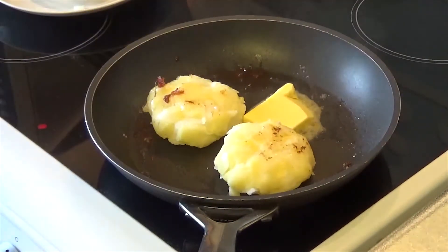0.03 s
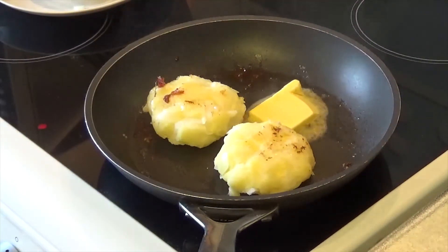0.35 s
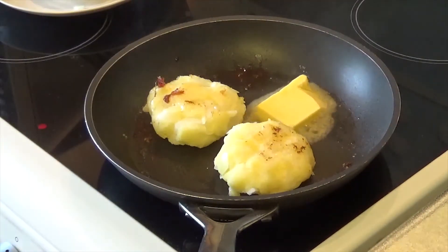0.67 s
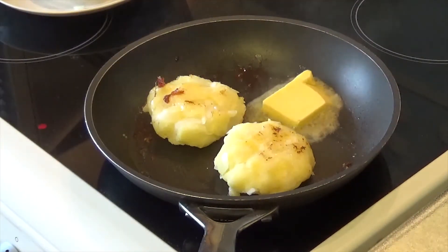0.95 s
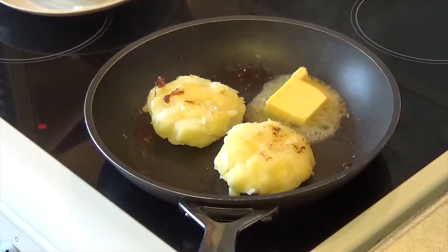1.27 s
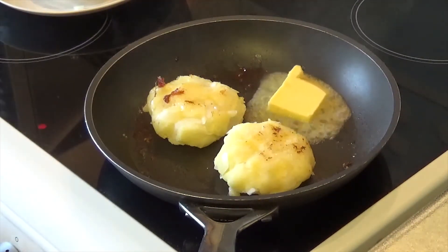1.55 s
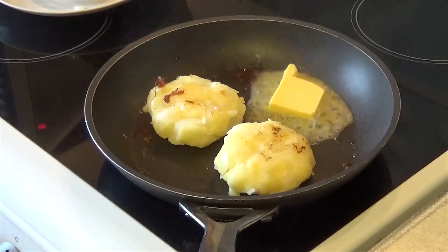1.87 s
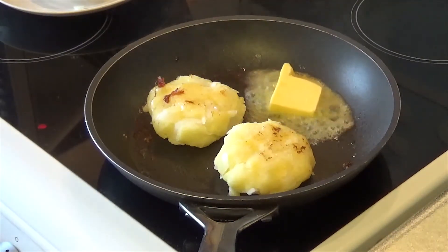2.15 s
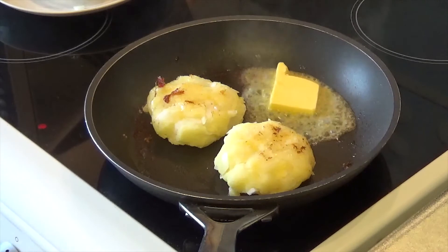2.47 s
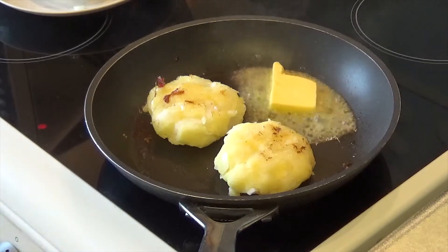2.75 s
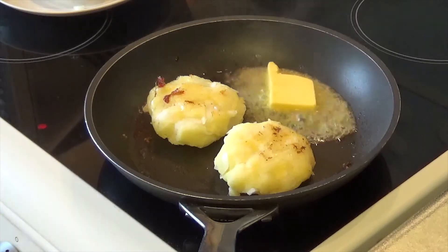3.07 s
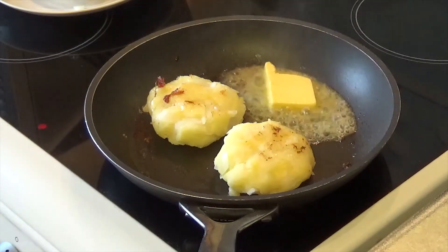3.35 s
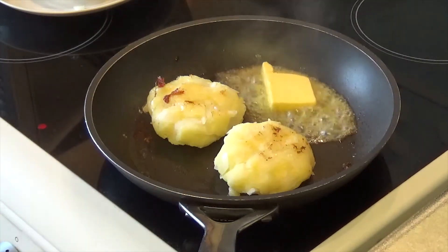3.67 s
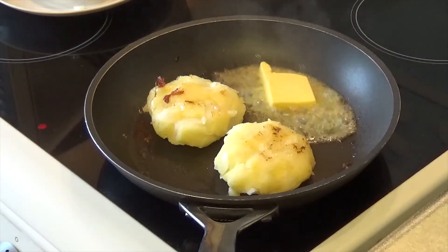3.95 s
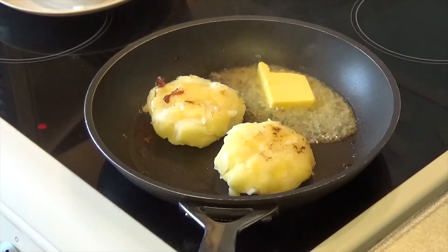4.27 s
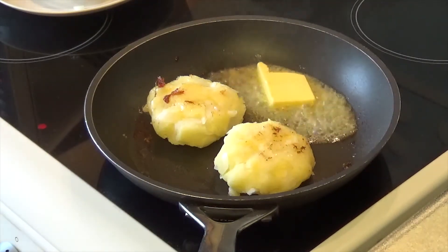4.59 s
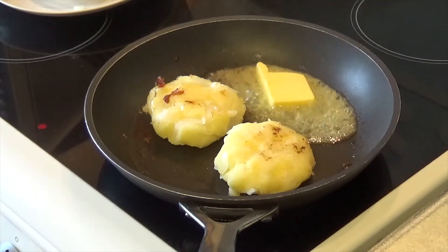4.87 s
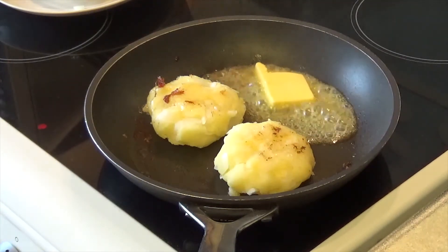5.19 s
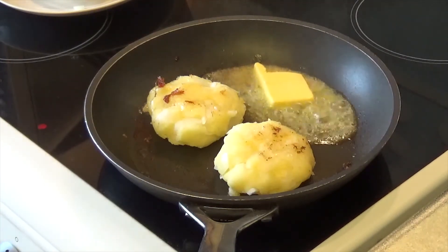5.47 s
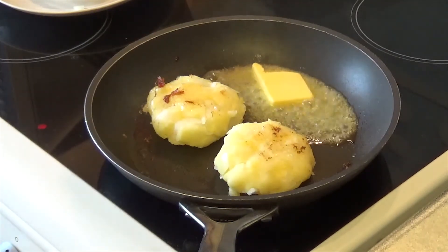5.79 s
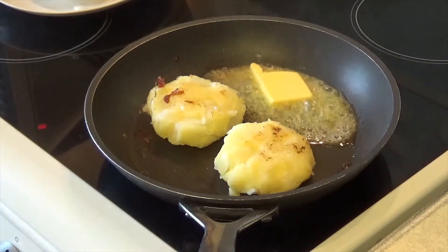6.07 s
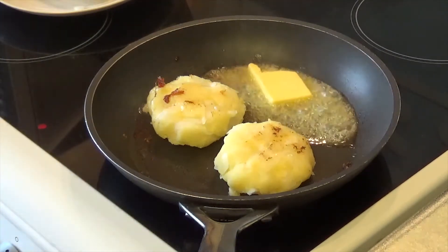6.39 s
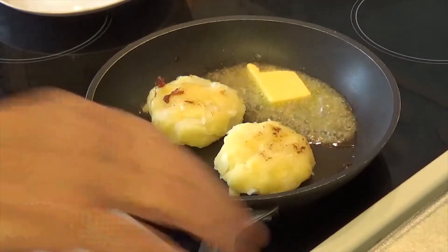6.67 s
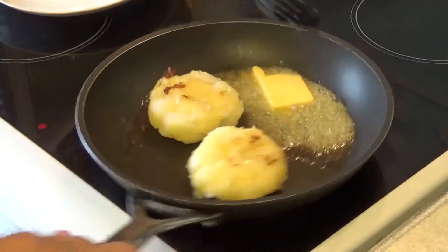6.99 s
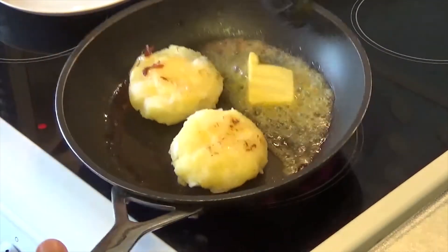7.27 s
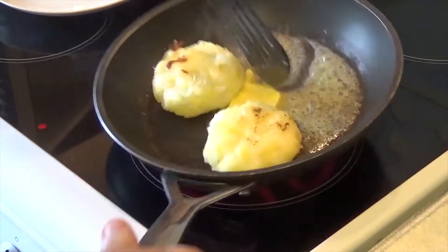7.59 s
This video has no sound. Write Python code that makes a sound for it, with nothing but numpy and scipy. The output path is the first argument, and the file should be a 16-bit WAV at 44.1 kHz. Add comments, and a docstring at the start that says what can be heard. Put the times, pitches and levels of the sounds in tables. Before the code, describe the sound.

In a small kitchen, a close microphone picks up the bright, continuous fizz of potato cakes frying in butter, over a faint fan. Further off, a utensil is dragged out with a ringing rasp, then objects clack and thud as they are put down. Fat spits now and then. Late on come a faint, thin whistle of steam, a sharp clink and knocks as the pan is tilted and fries harder.

```python
"""Potato cakes and a melting pat of butter sizzle in a frying pan, close to a camera's stereo microphone
in a small kitchen: water boils out in snaps and bubbles, fat spits and trapped steam sings thinly.
Further off, beside the hob, a utensil is dragged out with a loud stick-slip scrape that ducks the gain;
things are put down and metal clinks. The pan knocks on the hob as it is taken up and tilted.
A fan hums underneath."""
import sys
import numpy as np
from scipy import signal
from scipy.fft import rfft, irfft, next_fast_len
from scipy.io import wavfile
from scipy.ndimage import uniform_filter1d, map_coordinates

SR = 44100
rng = np.random.default_rng(int(sys.argv[2]) if len(sys.argv) > 2 else 0)


def waveform_to_disk(signal):
    """Save audio, clipped to [-1, 1], as 16-bit WAV at the path in sys.argv[1]."""
    frames = np.transpose(np.atleast_2d(signal))
    scaled = np.clip(frames, -1, 1) * 32767
    samples = np.round(scaled).astype(np.int16)
    wavfile.write(sys.argv[1], SR, samples)


N = 341334
TIME_S = np.arange(N) / SR
TOP_HZ = 11080  # the camera's band limit


def amp(db):
    """Decibels to gain."""
    return 10 ** (np.asarray(db) / 20)


def unit_rms(x):
    """x scaled to rms 1."""
    return x / np.sqrt(np.mean(x ** 2) + 1e-20)


def along(points, hz):
    """(freq_hz, value) points read on a log frequency axis."""
    freqs, values = np.transpose(points)
    return np.interp(np.log(hz + 1), np.log(freqs + 1), values)


def curves(rows):
    """One value per sample for each column after the time."""
    times, *columns = np.transpose(rows)
    return [np.interp(TIME_S, times, column) for column in columns]


def since(start_s):
    """Seconds gone by since start_s, 0 before it."""
    return np.maximum(TIME_S - start_s, 0)


def wobble(rate):
    """A smooth random curve, rate knots a second."""
    knots = rng.standard_normal(int(N * rate / SR) + 4)
    return map_coordinates(knots, [TIME_S * rate])


def filtered(x, response):
    """x through a filter given as a complex response of frequency."""
    n = x.shape[-1]
    padded = next_fast_len(n + SR // 4)
    return irfft(rfft(x, padded) * response(np.fft.rfftfreq(padded, 1 / SR)), padded)[..., :n]


def coloured(x, spectrum):
    """x shaped by (freq_hz, gain_db) points and cut at the band limit, at rms 1."""
    return unit_rms(filtered(x, lambda f: amp(along(spectrum, f)) * (f < TOP_HZ)))


def resonance(f, hz, width):
    """Response of one damped mode, width in Hz."""
    return 1j * f * width / (hz * hz - f * f + 1j * f * width)


def add(track, start_s, sound):
    """Mix a sound into the track at start_s."""
    part = track[round(start_s * SR):][:len(sound)]
    part += sound[:len(part)]


def snaps(rate, spread_db):
    """Random impulses, rate a second, with log-normal sizes, at rms 1."""
    polarity, size = rng.standard_normal((int(rate * N / SR), 2)).T
    impulses = np.sign(polarity) * amp(spread_db * np.minimum(size, 3))
    return unit_rms(np.bincount(rng.integers(0, N, len(size)), impulses, N))


# Decay of the small kitchen: freq_hz, t60_s
ROOM_DECAY = [(150, 0.42), (1000, 0.31), (10000, 0.23)]

def kitchen(x):
    """The room's diffuse answer at each microphone, new every 0.2 s; treble dies first."""
    out, step = np.zeros((2, N)), SR // 5
    for start in range(0, N, step):
        hz, t, noise = signal.stft(rng.standard_normal((2, SR // 3)), SR, nperseg=256)
        decay = amp(-60 * t / along(ROOM_DECAY, hz)[:, None])
        _, tail = signal.istft(noise * decay, SR, nperseg=256)
        wet = signal.fftconvolve(x[None, start:start + step], tail / np.linalg.norm(tail[0]), axes=1)
        for channel, answer in zip(out, wet):
            add(channel, start / SR + 0.004, answer)
    return out


# Air from the fan, in the background: freq_hz, gain_db
FAN_SPECTRUM = [(20, -17), (50, -16), (120, -0.5), (250, 0.5), (600, -4.5), (1200, 5), (3000, -31)]
# Its hum: pitch_hz, width_hz, level_db
FAN_HUM = [(295.5, 19.35, -66.5), (385.4, 9.7, -56), (889, 20.3, -57)]

def fan():
    """Soft moving air with a few tones that waver in pitch."""
    out = amp(-50.5) * coloured(rng.standard_normal(N), FAN_SPECTRUM)
    for hz, width, db in FAN_HUM:
        phase = 2 * np.pi * np.cumsum(hz + width / 2 * wobble(30)) / SR
        out += amp(db + 1.05 * wobble(8)) * unit_rms(np.sin(phase))
    return out


# Dry rub on the worktop, off-mic: freq_hz, gain_db
RUB_SPECTRUM = [(60, -28), (200, -5), (600, -5), (1200, -7), (2050, 1), (3000, -7), (7000, -24)]

def slide():
    """Something is pushed a little way over the worktop; the rub swells and dies quickly."""
    peak_s, rise_db_per_s, fall_db_per_s = 6.418, 285, 320
    t = TIME_S - peak_s
    level_db = -28.5 + np.minimum(rise_db_per_s * t, -fall_db_per_s * t)
    return amp(level_db) * coloured(snaps(rate=3000, spread_db=4.5), RUB_SPECTRUM)


def blow(hz, width_ratio, t60, attack):
    """A sharp contact on a body with many close, damped modes round one pitch; peak 1."""
    t = np.arange(SR // 2) / SR
    envelope = amp(-60 * t / t60) + attack * amp(-60 * t / 0.017)
    shake = rng.standard_normal(len(t)) * envelope
    body = filtered(shake, lambda f: resonance(f, hz, width_ratio * hz) ** 2)
    return body / np.abs(body).max()


# Low resonances that ring on after a knock in the small kitchen: pitch_hz, level_db
KNOCK_RESONANCES = [(112, -12), (146, 0.5), (200, 6), (243, 2), (298, 2), (345, -4), (390, 5), (480, -8),
                    (570, 0), (644, 6.5), (816, -15)]

def thud(hz, t60, span_octaves, push_db):
    """A soft blow: a dull push, and the room's low resonances near its pitch ring on."""
    t = np.arange(SR // 2) / SR
    mode_hz, db = np.transpose(KNOCK_RESONANCES)[:, :, None]
    scatter_db, detune, phase = rng.standard_normal((3, len(mode_hz), 1))
    gains = amp(db + scatter_db) * np.exp(-0.5 * (np.log2(mode_hz / hz) / span_octaves) ** 2)
    modes = gains * np.sin(2 * np.pi * (mode_hz * (1 + 0.01 * detune) * t + phase))
    ring = modes.sum(axis=0) * amp(-60 * t / t60) * (1 - np.exp(-t / 0.00089))
    push = blow(hz, width_ratio=3.06, t60=1.6 * t60, attack=1.0)
    return ring / np.abs(ring).max() + amp(push_db) * push


# Dull knocks on the worktop: start_s, level_db, pitch_hz, settle_db (relative to the first contact)
DULL_KNOCKS = [(0.063, -22.5, 150, -2), (.773, -11.5, 213, -11), (.989, -21, 213, -9),
               (1.168, -15.5, 340, -22), (2.512, -33, 290, -20), (2.566, -20.5, 187, -18),
               (4.1, -20.5, 345, -4.5), (5.076, -32.5, 342, -4), (5.575, -31.5, 332, -5),
               (6.36, -24, 387, -15), (6.42, -26, 205, -14), (6.496, -19.5, 262, -11),
               (6.831, -30, 291, -18), (7.06, -31, 260, -14), (7.667, -24.5, 284, -1)]
# Hard clacks of utensil and pan: start_s, level_db, pitch_hz, width_ratio, thud_db (relative to the ring)
HARD_CLACKS = [(.702, -21.5, 1520, .2, -11), (0.777, -8.5, 800, .34, -10), (1.907, -13.5, 2060, 0.29, -12),
               (1.973, -14, 2150, 0.28, -13.5), (2.068, -17.5, 1850, 0.23, -18),
               (6.897, -17.5, 1700, 0.66, -5), (7.398, -16, 810, 0.83, -5)]

def knocks():
    """Soft, heavy contacts thud and settle; hard ones click and ring briefly over their thud."""
    out = np.zeros(N)
    for start_s, db, hz, settle_db in DULL_KNOCKS:
        for delay_s, contact_db in [(0, 0), (0.046, settle_db)]:
            body = thud(hz, t60=0.18, span_octaves=0.37, push_db=-0.5)
            add(out, start_s + delay_s, amp(db + contact_db - 3.5) * body)
    for start_s, db, hz, width_ratio, thud_db in HARD_CLACKS:
        ring = blow(hz, width_ratio, t60=0.24, attack=0.36)
        click = blow(hz=1560, width_ratio=2.3, t60=0.23, attack=1.9)
        body = thud(hz=292, t60=0.23, span_octaves=0.74, push_db=3.4)
        add(out, start_s, amp(db - 3) * (ring + amp(2) * click + amp(thud_db) * body))
    dead_bump = thud(hz=110, t60=0.019, span_octaves=0.44, push_db=1)
    add(out, 2.229, amp(-34) * dead_bump)
    low_cut_hz = 105  # the microphone's low cut thins the deepest part of the knocks
    return filtered(out, lambda f: resonance(f, low_cut_hz, low_cut_hz) * 1j * f / low_cut_hz)


# Metal contacts, further off than the frying: start_s, level_db, softness_db_per_octave
METAL_TOUCHES = [(6.4964, -11.5, -3.5), (7.02, -24, 17), (7.515, -21, 20)]
# The modes they ring: pitch_hz, level_db, t60_s
METAL_MODES = [(2350, -1, 0.11), (2373, 0.5, 0.13), (2410, -18, 0.11), (3650, 4, .11), (3646, -1, 0.13),
               (5884, -4, 0.092)]

def clinks():
    """Metal touches metal, chatters and rings in close modes; a soft touch barely stirs the high ones."""
    out, t = np.zeros(N), np.arange(SR // 3) / SR
    hz, mode_db, t60 = np.transpose(METAL_MODES)[:, :, None]
    for start_s, db, softness in METAL_TOUCHES:
        gains = amp(mode_db - softness * np.log2(hz / hz.min()) - 60 * t / t60)
        chatter = np.cumsum(0.0084 * rng.standard_normal(gains.shape) * amp(-60 * t / 0.16), axis=1)
        modes = gains * np.sin(2 * np.pi * (hz * t + rng.random(hz.shape) + chatter))
        onset = 1 - np.exp(-t / 0.0006)
        add(out, start_s, amp(db - 3) * modes.sum(axis=0) * onset)
    return out


# Ringing steel of the scrape, beside the hob: pitch_hz, width_hz, level_db
STEEL_MODES = [(816, 20, -2), (843, 24, -8), (1525, 22, -4), (1736, 30, -7), (2407, 20, 0), (2470, 30, -4),
               (2673, 20, 0), (3014, 25, -4), (3389, 25, -1), (3706, 30, -2), (3900, 30, -3), (4027, 18, 0),
               (4390, 80, -6), (5130, 35, -1), (5529, 25, 2), (5640, 60, 0), (5823, 20, 7), (5955, 50, 0),
               (6180, 50, 0), (6860, 60, -4), (7160, 60, -7), (7730, 60, -6), (8930, 36, -6),
               (10270, 50, -7)]
# Its rasp: freq_hz, gain_db
RASP_SPECTRUM = [(30, -32), (100, -20), (203, -13), (289, -8.5), (743, -11.5), (820, -8), (2280, -4),
                 (5750, -9.5), (11000, -17.5), (14300, -47), (22000, -120)]

def scrape():
    """A dragged utensil sticks and slips; the slips rasp and ring the steel."""
    touch_s, bite_s, pressed_s, ease_s, lift_s = 0.701, 0.729, 0.78, 0.9, 1.044
    pressure_db = np.interp(TIME_S, [bite_s, pressed_s], [-15, -7.5], left=-33)
    level_db = pressure_db - 70 * since(ease_s) - 113 * since(lift_s)
    slips = snaps(rate=12000, spread_db=0) * amp(level_db + 0.55 * wobble(59.36)) * (TIME_S > touch_s)
    ring = filtered(slips, lambda f: sum(amp(db) * resonance(f, hz, bw) for hz, bw, db in STEEL_MODES))
    rasp = coloured(slips, RASP_SPECTRUM)
    return np.std(slips) * (amp(-2) * unit_rms(ring) + amp(-4) * rasp)


# Steam under the food, close up; two stretches, the second rising with the tilt: time_s, pitch_hz, level_db
STEAM_SONG = [
    [(5.4, 1428, -55), (5.62, 1392, -43.5), (6.1, 1320, -45)],
    [(6.55, 942, -49), (6.8, 942, -44), (7.08, 1076, -35.5), (7.18, 1080, -42), (7.32, 1278, -46),
     (7.5, 1303, -40), (7.74, 1280, -42)],
]

def steam():
    """Steam squeezes through a narrow gap and sings hoarsely, its strength and phase never steady."""
    out = np.zeros(N)
    for stretch in STEAM_SONG:
        hz, db = curves(stretch)
        singing = (TIME_S > stretch[0][0]) & (TIME_S < stretch[-1][0])
        phase = 2 * np.pi * np.cumsum(hz) / SR
        tone = (0.3 + wobble(125)) * np.sin(phase) + wobble(125) * np.cos(phase)
        out += singing * amp(db + 1.9 * wobble(18)) * unit_rms(tone)
    return out


# The loudest spits of fat, close to the microphone: start_s, level_db
FAT_SPITS = [(1.2436, -2), (3.842, -8), (3.8864, -8), (4.0427, -3), (4.305, -4), (5.1657, -7),
             (5.3564, -12)]

def spits():
    """A larger drop explodes with a high tick that dies in a few cycles."""
    out, t = np.zeros(N), np.arange(SR // 200) / SR
    for start_s, db in FAT_SPITS:
        hz = 7200 * np.exp(0.19 * rng.standard_normal())
        turns = hz * t
        add(out, start_s, amp(db - 6) * np.sin(2 * np.pi * turns) * np.exp(-turns / 2.4))
    return out


def bubbles(rate, low_hz, high_hz, cycles, spread_db):
    """Bursting bubbles: damped sines of random pitch, life and size, at rms 1."""
    count, age = int(rate * N / SR), np.arange(256)
    when, pitch = rng.random((count, 2)).T[:, :, None]
    life, size = np.clip(rng.standard_normal((count, 2)), -3, 3).T[:, :, None]
    hz = low_hz + (high_hz - low_hz) * pitch
    turns = hz * age / SR
    decay = np.exp(-turns / (cycles * np.exp(life / 2)))
    pops = amp(spread_db * size) * np.sin(2 * np.pi * turns) * decay
    positions = (when * N).astype(int) + age
    return unit_rms(np.bincount(positions.ravel(), pops.ravel())[:N])


# The close pan fries harder as the butter spreads and as it is tilted: time_s, fizz_db, foam_db
FRYING_LEVELS = [(0, -20.5, -31.5), (.7, -20, -29.5), (1.5, -21, -33), (3.0, -18.5, -26.5),
                 (5.2, -21, -27.3), (6.25, -19.5, -25.7), (7.3, -20, -27.5), (7.45, -16, -30.5),
                 (7.74, -15.5, -31)]
# Fine fizz of the potato: freq_hz, gain_db
FIZZ_SPECTRUM = [(900, -26.5), (2500, -13), (4300, -8), (5000, -2.5), (5900, 1.5), (7000, -4), (8300, -5.5),
                 (9800, -1), (11000, -2)]
# Coarser foam of the butter: freq_hz, gain_db
FOAM_SPECTRUM = [(150, -49.5), (500, -15), (1200, -12.5), (2000, -5.5), (2600, -1.5), (3600, 3.5),
                 (4300, 1.5), (6000, -3.5), (10000, -13.5)]

def sizzle():
    """Water boils out of the potato in spurts of snaps and tiny bubbles, of the butter in coarser ones."""
    fizz_db, foam_db = curves(FRYING_LEVELS)
    spurts_db = 0.14 * wobble(5) + 0.51 * wobble(14) + 0.96 * wobble(70)
    fine = snaps(rate=14000, spread_db=4.5)
    fine += amp(-4.5) * bubbles(rate=3000, low_hz=6760, high_hz=11150, cycles=2.07, spread_db=5)
    coarse = snaps(rate=6000, spread_db=4.5)
    coarse += amp(-13) * bubbles(rate=900, low_hz=1365, high_hz=5930, cycles=7.9, spread_db=5.5)
    fizz = amp(fizz_db - 0.22 + spurts_db + 0.28 * wobble(20)) * coloured(fine, FIZZ_SPECTRUM)
    foam = amp(foam_db - 0.87 + 0.54 * wobble(16)) * coloured(coarse, FOAM_SPECTRUM)
    return fizz + foam


def scene():
    """The pan is close and drier, the handling further off; the two microphones sit almost together."""
    pan = sizzle() + spits() + steam()
    around = scrape() + slide() + knocks() + clinks() + fan()
    left, right = pan + around + kitchen(amp(-7.5) * pan + amp(-5) * around)
    mid = (left + right) / 2
    side = amp(-8) * (left - right) / 2 + 0.013 * pan + 0.074 * around
    return np.array([mid + side, mid - side])


def gain_control(x, threshold_db, release_db_per_s):
    """Loud sound at the microphone turns the gain down at once; it then creeps back."""
    power = np.abs(uniform_filter1d(np.mean(x ** 2, axis=0), size=SR // 50))
    excess_db = np.maximum(10 * np.log10(power + 1e-12) - threshold_db, 0)
    creep_db = release_db_per_s * TIME_S
    return x * amp(creep_db - np.maximum.accumulate(excess_db + creep_db))


def record(dry):
    """The camera rides its gain, rounds off the tallest peaks and keeps nothing above its band limit."""
    ducked = gain_control(dry, threshold_db=-11.5, release_db_per_s=6.5)
    rounded = ducked / (1 + np.abs(ducked / 0.85) ** 6) ** (1 / 6)
    return filtered(rounded, lambda f: f < TOP_HZ)


dry = scene()
out = record(dry)
waveform_to_disk(out)
```